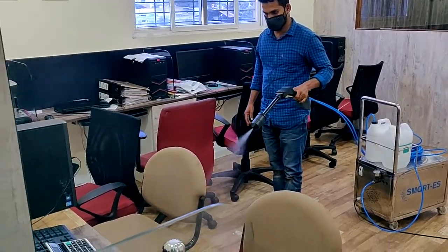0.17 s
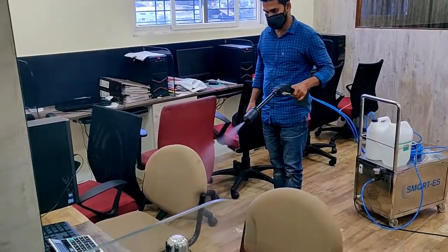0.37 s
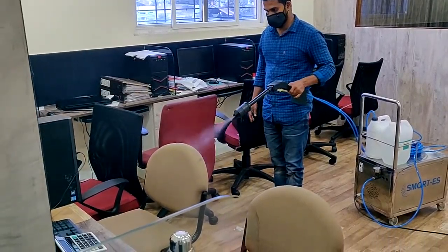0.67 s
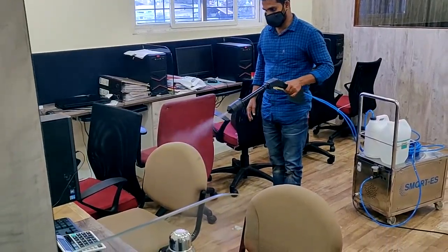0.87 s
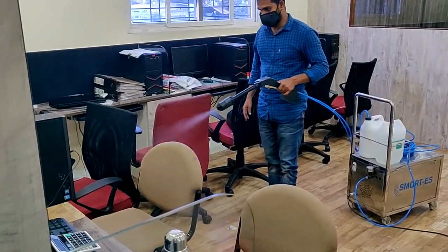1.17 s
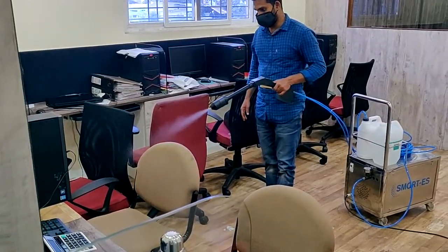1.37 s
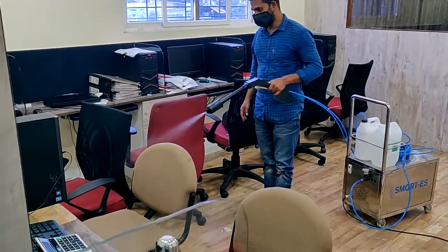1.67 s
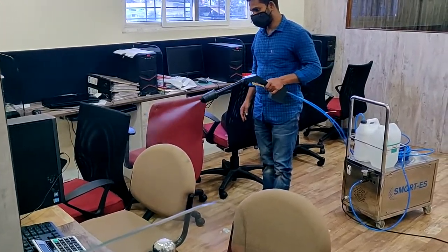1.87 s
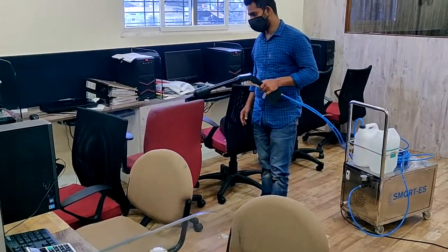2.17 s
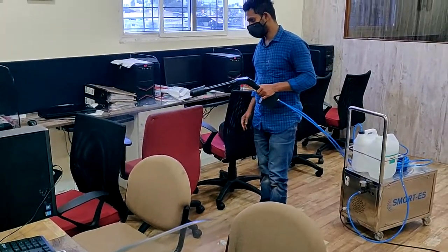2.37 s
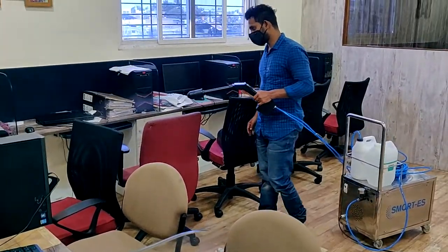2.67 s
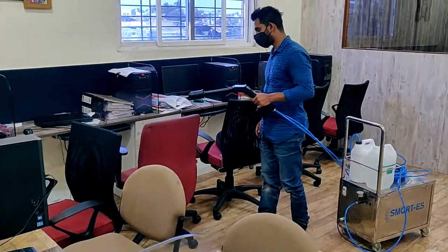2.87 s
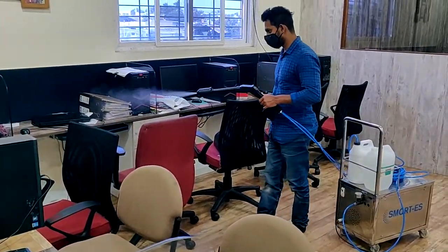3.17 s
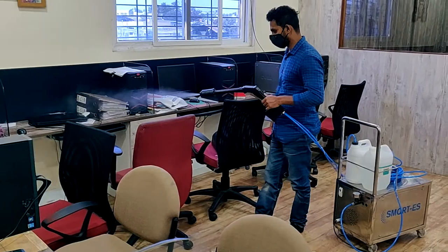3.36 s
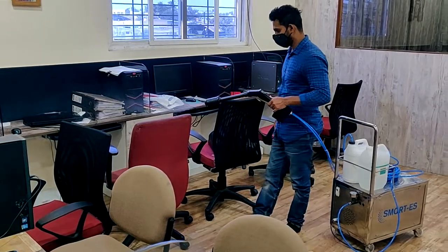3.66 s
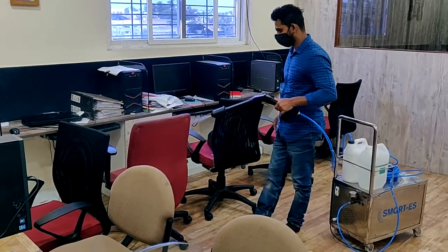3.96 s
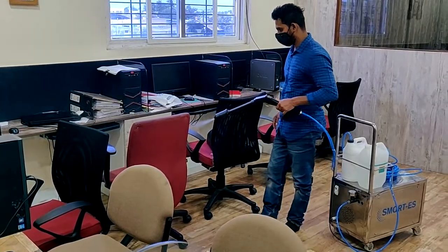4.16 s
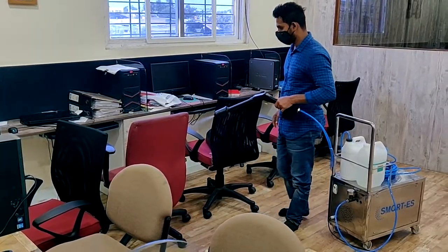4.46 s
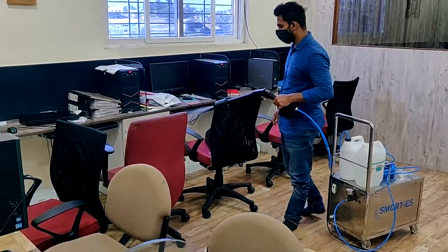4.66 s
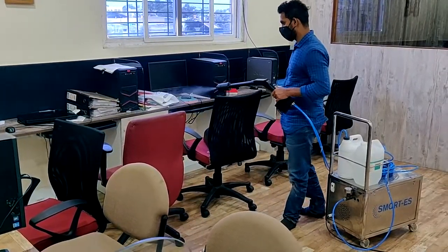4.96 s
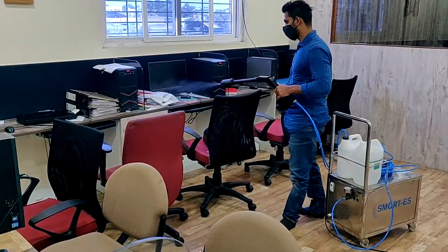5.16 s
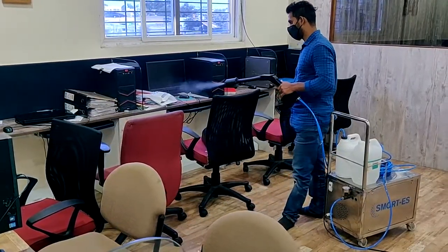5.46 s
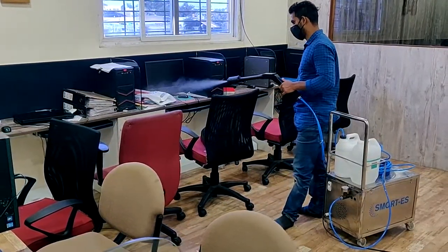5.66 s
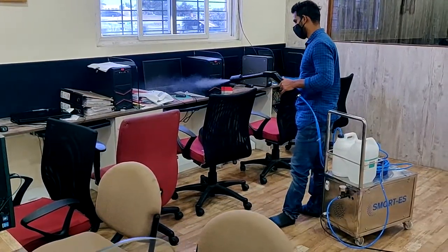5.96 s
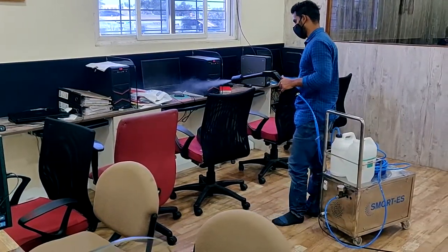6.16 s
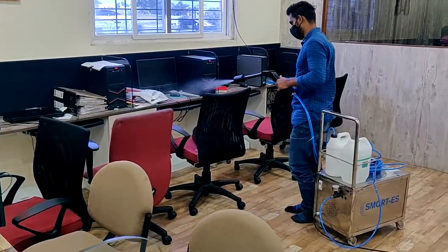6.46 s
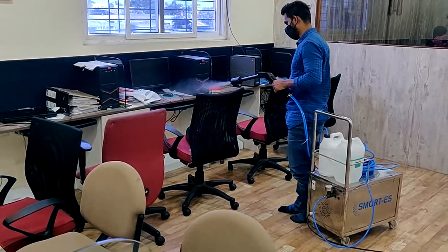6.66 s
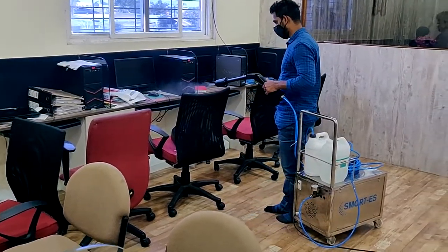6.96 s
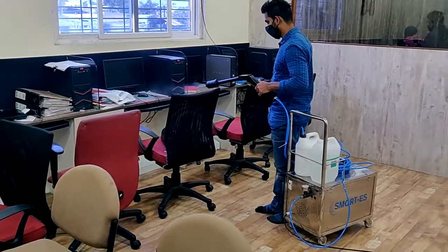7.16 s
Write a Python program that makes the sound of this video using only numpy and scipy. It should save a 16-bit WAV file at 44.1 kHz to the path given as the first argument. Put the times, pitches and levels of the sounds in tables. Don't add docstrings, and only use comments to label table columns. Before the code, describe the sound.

A spraying machine runs continuously in an office for about 7.3 seconds, already going at the start and still going at the end. Its piston compressor makes fast, even thumps, about 24 per second, merging into a low, buzzing drone strongest below roughly 350 Hz, with motor hum and a boxy cabinet rumble that makes the room resonate. Over it lies an unbroken mist hiss, brightest around 6 to 8 kHz, slightly fluttering and swaying. The phone's level dips near 0.5 s, then steps up by 0.9 s, as the nozzle turns away and its highest treble softens slightly. The hiss is a touch weaker around 3 s. From 4.5 to 6.5 s a low wavering tone near 119 Hz swells and fades; after 6 s the drone pulses about three times per second. The upper buzz gradually dulls. Phone sound, a few metres away, thin and grainy treble.

```python
import sys
import numpy as np
from scipy import signal
from scipy.fft import rfft, irfft
from scipy.io import wavfile
from scipy.ndimage import uniform_filter1d

SR = 44100
rng = np.random.default_rng(int(sys.argv[2]) if len(sys.argv) > 2 else 0)


def master_out(mix):
    frames = np.transpose(np.atleast_2d(mix))
    ceiling = np.clip(frames, -1, 1)
    pcm = np.round(ceiling * 32767).astype(np.int16)
    wavfile.write(sys.argv[1], SR, pcm)


def gain_from_db(level_db):
    decades = np.asarray(level_db, float) / 20
    return 10 ** decades


N = 322371
TIME = np.arange(N) / SR
BINS_HZ = np.fft.rfftfreq(N, 1 / SR)


def curve(s, values):
    return np.interp(TIME, s, values)


def arch(start, end):
    return np.sin(np.pi * np.clip((TIME - start) / (end - start), 0, 1))


def walk(rate):
    every = 64
    hold = int(SR / rate / every)
    steps = np.repeat(rng.standard_normal(N // (every * hold) + 2), hold)
    slow = uniform_filter1d(uniform_filter1d(steps, hold), hold)
    slow = np.interp(np.arange(N) / every, np.arange(len(slow)), slow)
    return (slow - slow.mean()) / slow.std()


def shape(hz, db):
    level_db = np.interp(np.log(BINS_HZ + 1), np.log(hz), db)
    return gain_from_db(level_db) * np.sqrt(SR / 2)


def pair(alike_hz):
    mid, side = rfft(rng.standard_normal((2, N)))
    alike = 1 / (1 + (BINS_HZ / alike_hz) ** 6.0)
    opposite = np.array([[1], [-1]])
    return (np.sqrt(1 + alike) * mid + np.sqrt(1 - alike) * side * opposite) / np.sqrt(2)


def tone(phase, db, pan_db, drift_db):
    lead = np.array([[1], [-1]])
    port_phase = lead * 0.043 * rng.standard_normal()
    wave = np.cos(phase + port_phase + 0.04 * drift_db * walk(1.37))
    level = gain_from_db(db + drift_db * walk(1.66)) * gain_from_db(lead * pan_db / 2)
    return np.sqrt(2) * level * wave


# (multiple of the shaft rate, level/dB rms, left minus right/dB)
STROKE_TONES = [(2.005, -38.5, -2.5), (4, -39, 2), (5, -57, -3), (5.97, -37.5, 2), (6.9, -34, 0),
                (8, -51.5, -12), (8.7, -33, -1), (10, -55, -10), (11, -49.5, 8.5), (12, -54, -9),
                (12.92, -52, -5), (14, -46.5, 1.5), (14.91, -42, 2), (16.36, -64, -2), (16.95, -42, -3),
                (18.16, -56, 3), (19, -50.5, 9.5), (21, -57.5, 4), (22.3, -76, 13), (23, -67, 15),
                (27.31, -60, 1), (28, -69, -4), (36.8, -64.5, 16), (37.9, -66.5, 10), (45.8, -67, 10),
                (48.1, -71, 3)]
# (start t/s, end t/s, multiple of the shaft rate, level change/dB)
BODY_SHADES = [
    (.5, 1.8, 6, -2),
    (3.6, 4.6, 17, -3),
    (6.3, 8.5, 17, -7.5),
]
FLOOR_REFLECTED = (8, 12, 18)


def compressor():
    shaft_hz, first_stroke_s = 24.07, .0049
    shade_from_s, shade_db_per_s, shade_above = 1.1, -0.27, 13.5
    throb_multiple, throb_db, throb_per_s = 6, 6, 3.15
    throb_from_s, throb_peak_s = 6.06, 6.8
    shaft = 2 * np.pi * shaft_hz * (TIME - first_stroke_s) + .01 * walk(.6)
    multiple, level_db, _ = np.transpose(STROKE_TONES)
    lags = 1.1 - 1.5 / multiple + 1.7 * np.exp(-((multiple - 5.7) / 2.1) ** 2)
    lags = lags + np.pi * np.isin(np.round(multiple), FLOOR_REFLECTED)
    lags = lags + np.where(level_db < -56, 1.5, .1) * rng.standard_normal(len(multiple))
    shade_db = shade_db_per_s * (np.maximum(TIME, shade_from_s) - TIME.mean())
    out = 0
    for (k, db, pan_db), lag in zip(STROKE_TONES, lags):
        order = round(k)
        shift_db = (k > shade_above) * shade_db
        for start, end, shaded, change_db in BODY_SHADES:
            if round(shaded) == order:
                shift_db = shift_db + change_db * arch(start, end)
        if order == throb_multiple:
            beat = np.cos(2 * np.pi * throb_per_s * (TIME - throb_peak_s))
            shift_db = shift_db + throb_db * beat * np.clip((TIME - throb_from_s) / .3, 0, 1)
        out = out + tone(order * shaft + lag, db + shift_db, pan_db, drift_db=0.15 + 0.036 * k)
    return out


# (multiple of the mains f, level/dB rms)
MOTOR_HUM = [(2, -56.5), (4, -42)]


def motor():
    mains_hz = 50.09
    return sum(tone(2 * np.pi * round(k) * mains_hz * TIME, db, 0, drift_db=-1.5) for k, db in MOTOR_HUM)


# (f/Hz, left level/dB per Hz, right level/dB per Hz)
MIST_JET = [(600, -75.5, -81.5), (1350, -77.5, -80.5), (3140, -71.5, -73), (4020, -67, -67.5),
            (4810, -59.5, -60), (5930, -54.5, -59.5), (6180, -50, -57.5), (6780, -50.5, -54.5),
            (7520, -59, -52), (8180, -59, -58.5), (8950, -73, -63), (9660, -67.5, -65.5),
            (12700, -67.5, -67), (15800, -62.5, -63.5)]
# (t/s, nearness level/dB, aim at the phone 0-1)
NOZZLE_SWEEP = [
    (0, 0.3, 1),
    (.55, 0.5, 1),
    (.9, 0.7, 0.3),
    (1.9, 0, 0.38),
    (2.6, 0, 0.25),
    (3.2, -0.66, 0.36),
    (5.1, 0.06, 0.25),
    (5.9, -.6, 0.53),
    (7.31, -.3, 0.24),
]


def jet():
    beam_db, sway_db, sway_per_s = 1.5, 0.8, 3.21
    s, near_db, aim = np.transpose(NOZZLE_SWEEP)
    top_db = beam_db * curve(s, aim - aim.mean())
    body_db = curve(s, near_db) + sway_db * walk(sway_per_s) * np.array([[.5], [-.5]])
    hz, left_db, right_db = np.transpose(MIST_JET)
    noise = pair(alike_hz=755) * [shape(hz, left_db), shape(hz, right_db)]
    place = 3 * np.log2(BINS_HZ / 2000 + 1e-9)
    out = 0
    for k in range(10):
        window = np.clip(1 - abs(np.clip(place, 0, 9) - k), 0, 1)
        aim_db = top_db if k > 6 else body_db * min(k / 4, 1)
        depth_db = .25 if k > 5 else .15 * k
        flicker_db = [depth_db * (walk(4.5) + 0.61 * walk(9)) for _ in range(2)]
        out = out + irfft(noise * window, N) * gain_from_db(aim_db + np.array(flicker_db))
    return out


# (f/Hz, level/dB per Hz)
CABINET_RUMBLE = [(24, -79), (30, -64), (56, -69), (75, -77), (95, -67), (135, -61.5), (160, -62),
                  (182, -57), (205, -58.5), (225, -70), (450, -73.5), (600, -73.5), (1200, -77),
                  (2500, -90)]
# (f/Hz, width/Hz, level/dB rms)
RINGING_MODES = [(52, 3, -46.5), (124, 4.3, -50), (143, 5.5, -68), (159, 8, -64), (184, 3.3, -44),
                 (373, 18, -49.5), (415.4, 16, -51), (495, 12, -53.5), (654.5, 6.4, -55.5)]


def rumble():
    power = shape(*np.transpose(CABINET_RUMBLE)) ** 2
    for hz, width, db in RINGING_MODES:
        peak = gain_from_db(db) ** 2 * SR / (np.pi * width)
        power = power + peak / (1 + (2 * (BINS_HZ - hz) / width) ** 2)
    return irfft(np.sqrt(power) * pair(alike_hz=714), N) * gain_from_db(1.0 * walk(2.97))


# (start t/s, end t/s, f/Hz, level/dB rms)
MODE_SWELLS = [
    (4.5, 6.5, 118.8, -37.5),
    (0.8, 1.37, 110, -51),
]


def swells():
    out = 0
    for start, end, hz, db in MODE_SWELLS:
        phase = 2 * np.pi * hz * TIME + .3 * walk(5.6)
        out = out + arch(start, end) * tone(phase, db, 0, drift_db=1.5)
    return out


def scene():
    return compressor() + motor() + jet() + rumble() + swells()


# (f/Hz, threshold level/dB re the mean there)
THIN_THRESHOLD = [(1200, -14), (1900, -.5), (2300, -5), (2900, -2), (3300, 3), (3700, 0), (4200, 4),
                  (4500, 1), (5000, 0), (5600, -7), (7700, -8), (8700, 5), (9200, 2.5), (11500, 3.5),
                  (15000, 2.8)]


def starve(x):
    top_hz = 15840
    frame = dict(nperseg=2048, noverlap=1024, window="cosine")
    both = np.array([x[0] + x[1], x[0] - x[1]]) / 2
    hz, _, cells = signal.stft(both, SR, **frame)
    power = abs(cells) ** 2 + 1e-18
    mean = uniform_filter1d(power.mean(axis=2, keepdims=True), size=9, axis=1)
    patch = uniform_filter1d(rng.standard_normal(cells.shape), size=5, axis=1)
    patch = uniform_filter1d(patch, size=4, axis=2)
    bar_db = np.interp(hz, *np.transpose(THIN_THRESHOLD))[:, None] + 2.7 * patch / patch.std()
    over_db = 10 * np.log10(power / mean) - bar_db
    keep = (1 + np.tanh(over_db / 1.5)) / 2
    kept = uniform_filter1d((power * keep ** 2).mean(axis=2, keepdims=True), size=9, axis=1)
    lift = np.sqrt(mean / kept)
    cells = cells * keep * lift * (hz < top_hz)[:, None]
    mid, side = signal.istft(cells, SR, **frame)[1][:, :N]
    return np.array([mid + side, mid - side])


# (t/s, level/dB)
PHONE_GAIN = [
    (0, -1.5),
    (.55, -2.5),
    (.85, 0.5),
    (1.5, .5),
    (3, 0.5),
    (7.31, -.5),
]


def auto_gain(x):
    return x * gain_from_db(curve(*np.transpose(PHONE_GAIN)))


def low_pass(x):
    return signal.sosfilt(signal.butter(12, 15850, fs=SR, output="sos"), x)


def record(dry):
    mix = auto_gain(starve(dry))
    return low_pass(mix)


dry = scene()
out = record(dry)
master_out(out)
```